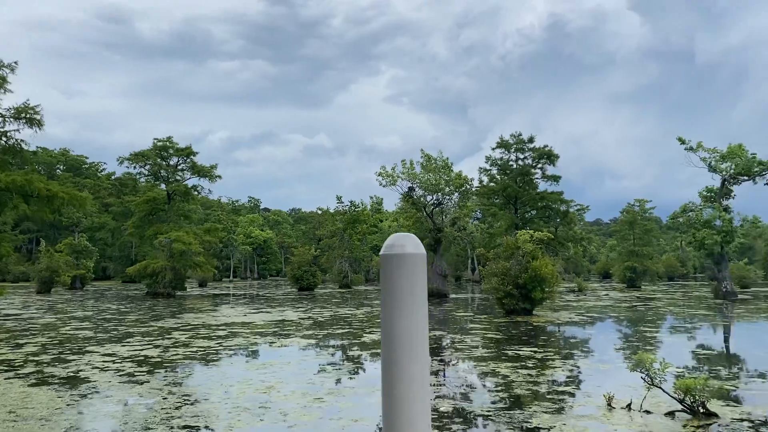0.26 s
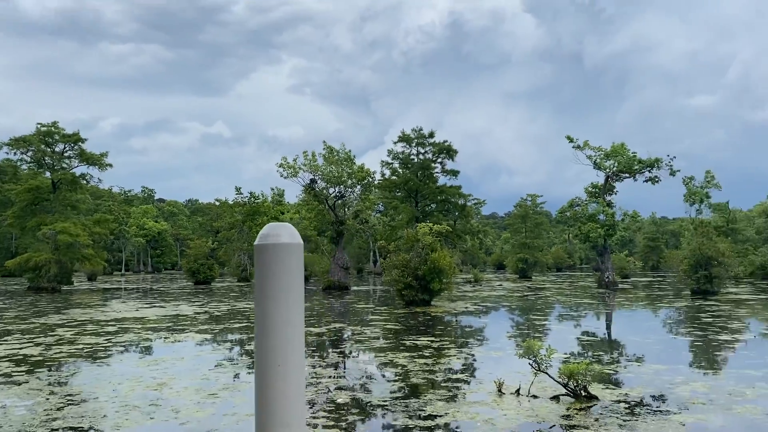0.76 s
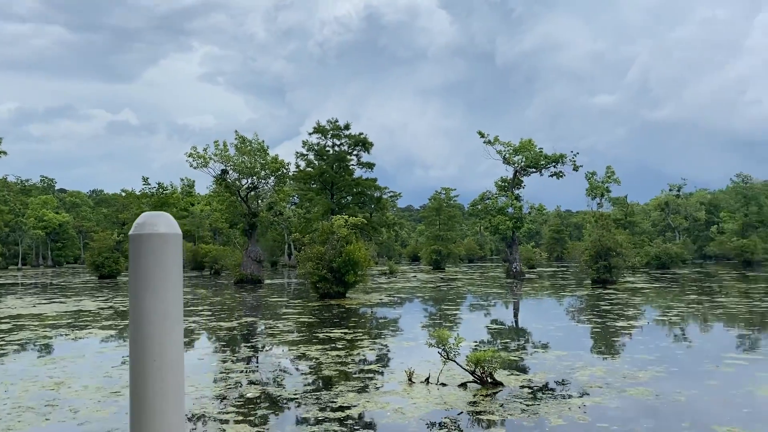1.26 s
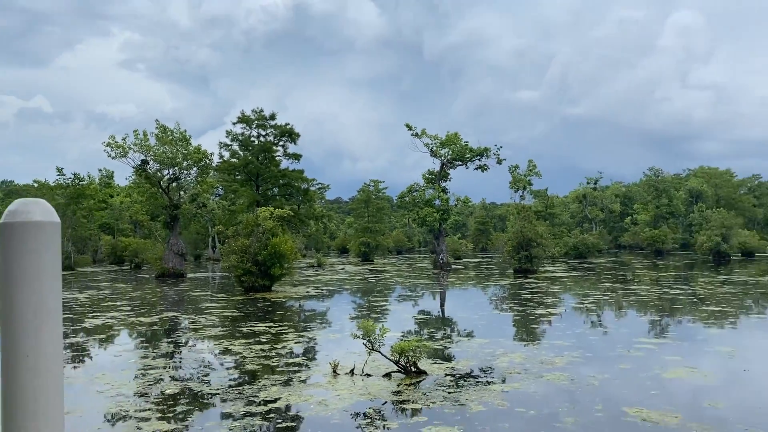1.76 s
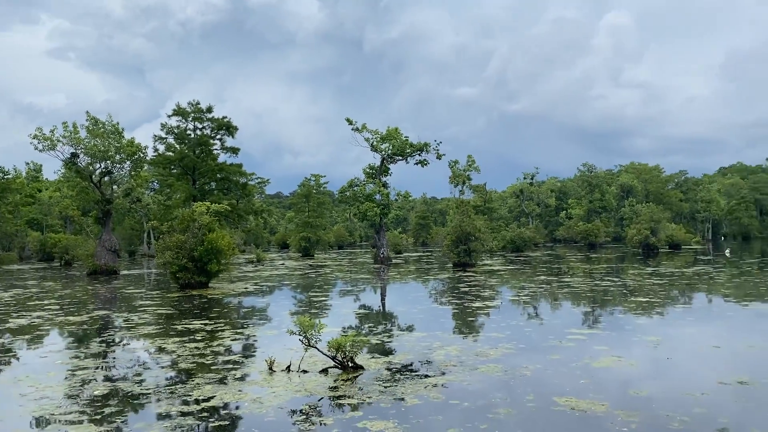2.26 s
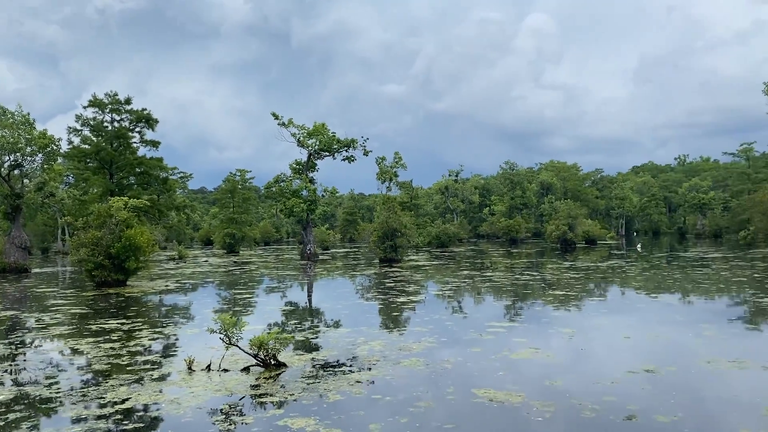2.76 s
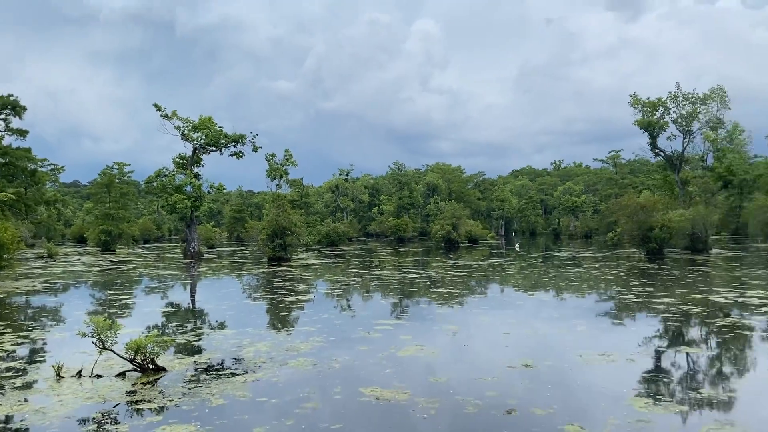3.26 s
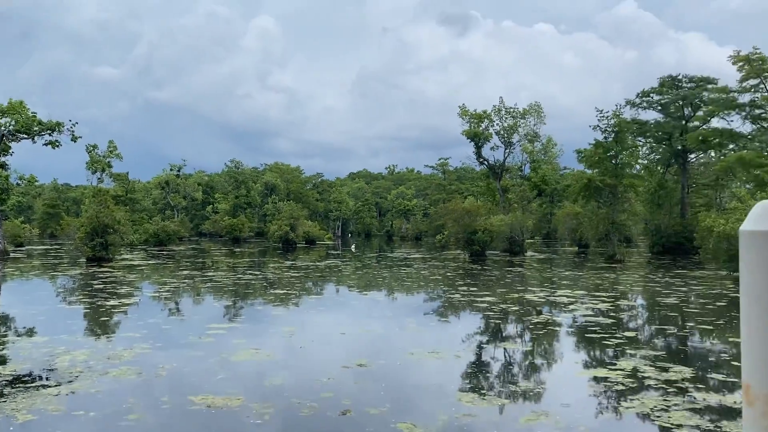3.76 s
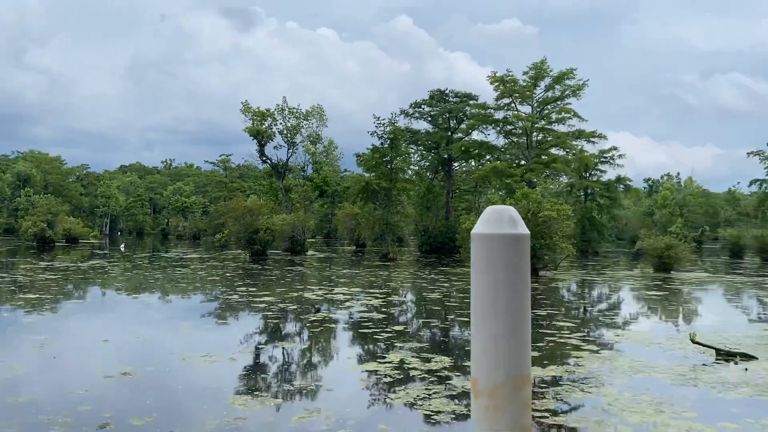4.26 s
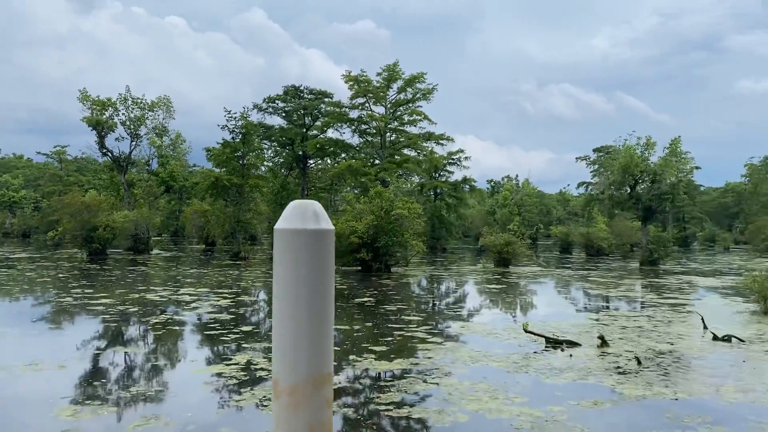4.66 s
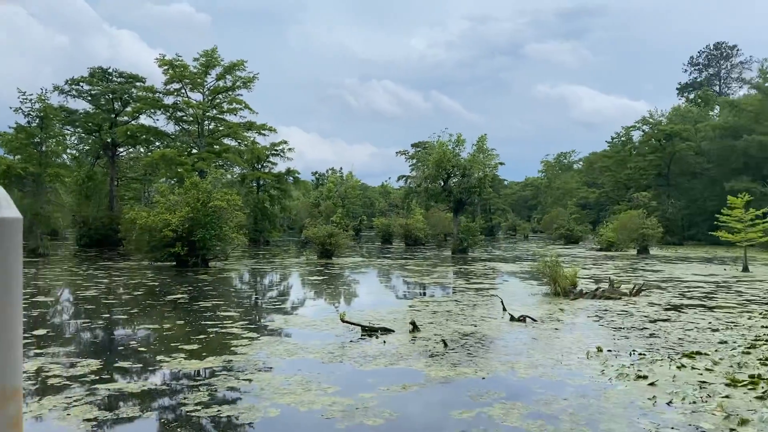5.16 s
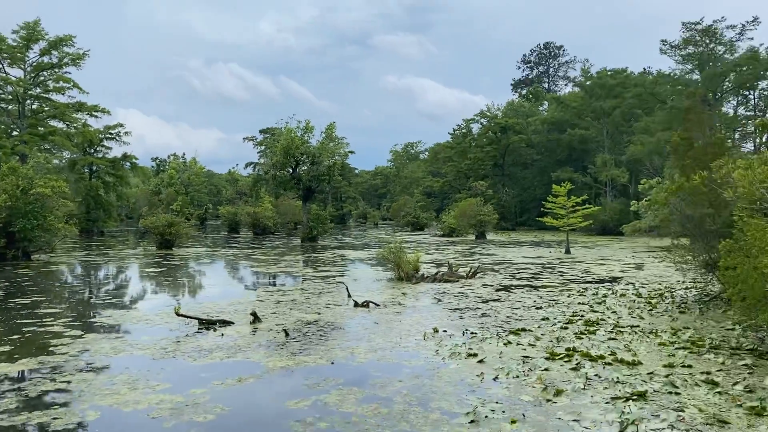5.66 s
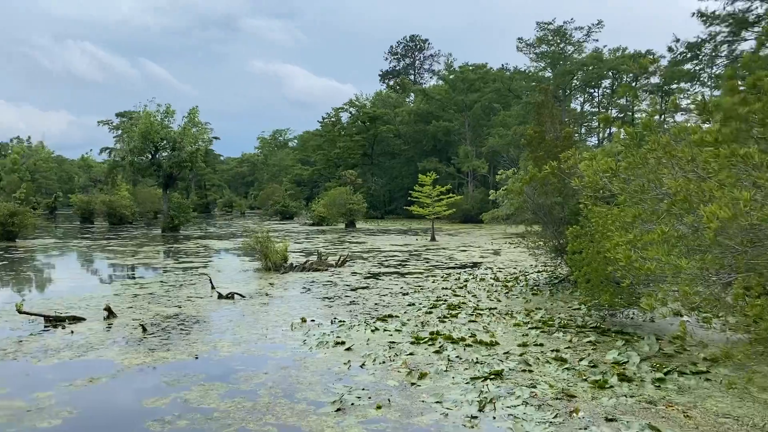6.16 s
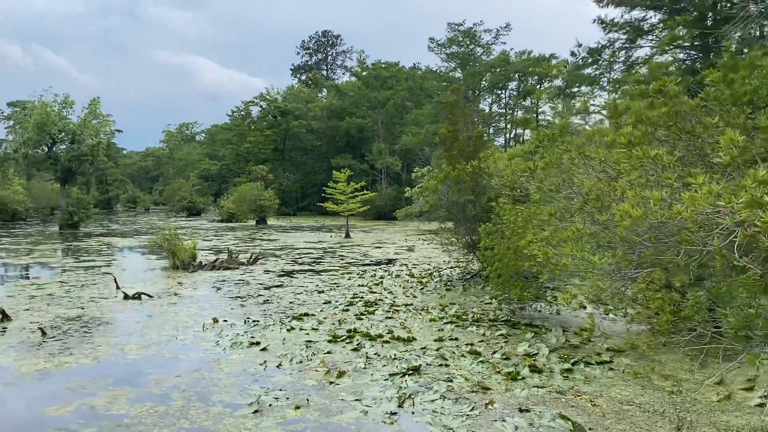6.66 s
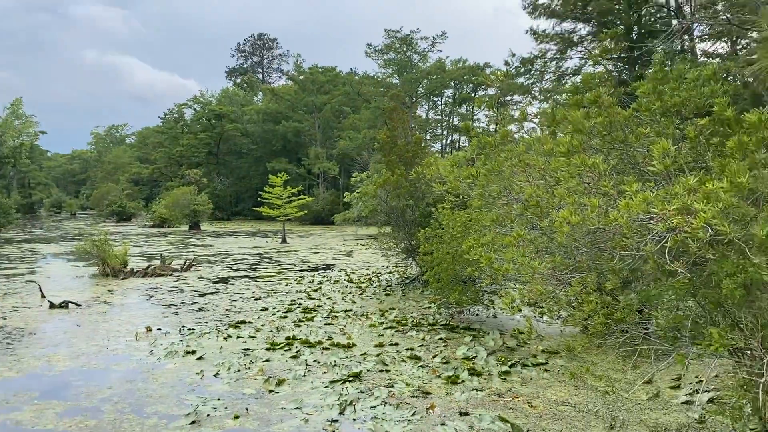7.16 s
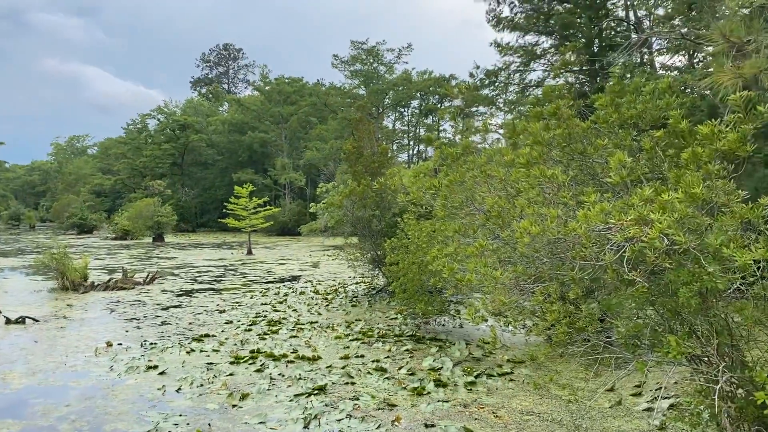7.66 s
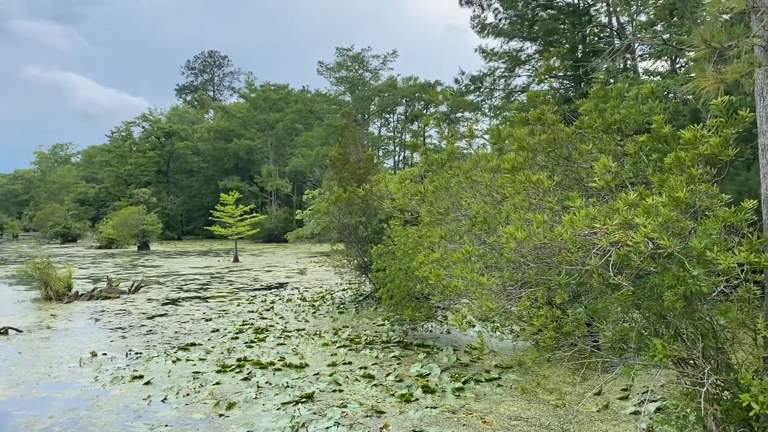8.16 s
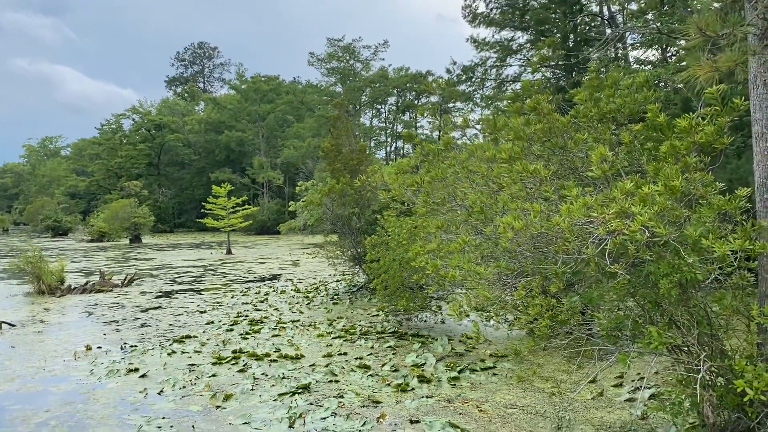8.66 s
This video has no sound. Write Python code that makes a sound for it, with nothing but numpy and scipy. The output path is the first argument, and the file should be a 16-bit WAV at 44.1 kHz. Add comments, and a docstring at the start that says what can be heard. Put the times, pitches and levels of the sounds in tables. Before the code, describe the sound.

High, clicking frog calls carry across a pond, joined by increasingly strong sharp ticks above a soft low rumble.

```python
"""Cricket frogs in a swamp

Frogs click across a pond while the listener slowly turns. Each note is a burst of pulses that ring
the vocal sac: double calls, high peeps, rattles and clucks. Far frogs join in, sharp ticks come from
the near bank, a faint bird whistles and the trees echo. Under it all lie a few dull knocks, two
distant hollow booms, a low rumble and a hush of air."""
import sys
import numpy as np
from scipy import signal
from scipy.fft import rfft, irfft, next_fast_len
from scipy.io import wavfile
from scipy.ndimage import uniform_filter1d, map_coordinates

SR = 44100
rng = np.random.default_rng(int(sys.argv[2]) if len(sys.argv) > 2 else 0)


def store_wav(level_fs):
    """Save 16-bit WAV to argv[1]."""
    pcm = np.round(np.clip(np.atleast_2d(level_fs), -1, 1) * 32767)
    wavfile.write(sys.argv[1], SR, pcm.T.astype(np.int16))


N = 392490

# the leading frog (time [s], level [dB], length [s], head start of its short first note [s])
DOUBLE_CALLS = [(0.468, -48.5, 0.014, 0.027), (2.0364, -37, 0.016, 0.039), (2.3899, -39.5, 0.037, 0.024),
                (2.6103, -37.5, 0.028, 0.051), (2.977, -38.5, 0.04, 0.021), (3.197, -37, 0.025, 0.038),
                (3.4022, -37, 0.033, 0.047), (3.6018, -37.5, 0.024, 0.044), (3.786, -39.5, 0.036, 0.033),
                (4.578, -42, 0.029, 0.062), (4.789, -37, 0.03, 0.038), (4.982, -37, 0.028, 0.036),
                (5.176, -36.5, 0.019, 0.029), (5.3647, -37, 0.024, 0.046), (5.5688, -37, 0.017, 0.032),
                (5.743, -37, 0.028, 0.016)]
# a small, high frog (time [s], level [dB], length [s])
PEEPS = [(0.168, -46, 0.014), (0.7611, -46, 0.027), (1.361, -42.5, 0.021), (1.915, -42.5, 0.028),
         (2.719, -46, 0.017), (3.252, -51, 0.04), (4.906, -40.5, 0.03), (5.111, -43.5, 0.0042),
         (5.4582, -40.5, 0.024), (5.748, -43, 0.045), (6.567, -40.5, 0.025), (6.6066, -41.5, 0.033),
         (7.147, -38, 0.019), (7.284, -41, 0.017), (7.69, -39.5, 0.044), (8.253, -39.5, 0.045),
         (8.325, -42.5, 0.035)]
# long rattles and short clucks (time [s], level [dB], length [s], pitch [Hz])
RATTLES = [(.025, -47.5, 0.08, 3460), (.624, -44.5, 0.081, 3560), (1.213, -41, 0.056, 3620),
           (1.758, -39.5, 0.06, 3614), (2.217, -51.5, 0.04, 4380), (3.985, -48, 0.035, 3305),
           (4.202, -41.5, 0.046, 3504), (4.352, -39.5, 0.05, 3796), (5.848, -42, 0.034, 3720),
           (5.973, -46.5, 0.05, 4000), (6.204, -50, 0.052, 3560), (6.459, -42, 0.046, 3770),
           (7.032, -49.5, .067, 3736), (7.127, -38.5, 0.05, 3776), (7.55, -46.5, 0.035, 3800),
           (7.823, -42, 0.047, 3780), (8.125, -46.5, 0.04, 3740), (8.583, -42, 0.044, 3703),
           (8.792, -47, 0.039, 3830)]
CLUCKS = [(.122, -55, 0.014, 3820), (.26, -49.5, .025, 3655), (.726, -47, 0.011, 3720),
          (.831, -43, 0.019, 3765), (.896, -45.5, 0.023, 3650), (1.137, -48.5, 0.028, 3620),
          (1.301, -44, 0.014, 3660), (1.645, -45, 0.015, 3770), (1.724, -44.5, 0.025, 3700),
          (2.4872, -45.5, 0.019, 3620), (2.516, -45.5, 0.016, 3620), (2.779, -52, 0.037, 3820),
          (3.104, -49, 0.023, 3760), (3.305, -50, 0.037, 3420), (3.525, -51.5, 0.0085, 3690),
          (3.934, -49.5, 0.014, 3440), (4.125, -51.5, 0.032, 3720), (4.485, -55, 0.041, 3750),
          (5.018, -40.5, .018, 3890), (5.272, -47.5, 0.033, 3755), (6.65, -46, 0.036, 3650),
          (6.696, -42.5, 0.017, 3780), (7.318, -47, 0.027, 3750), (7.636, -41, 0.022, 3880),
          (8.035, -56.5, 0.0098, 3950), (8.185, -47.5, 0.042, 3570), (8.377, -43.5, 0.047, 3810),
          (8.415, -41.5, 0.011, 3820)]
# how the vocal sac rings (multiple of the pitch, level [dB], fade time [s])
SAC_RINGS = [(1, 2, 0.0023), (.83, -9, 0.0021), (1.9, -35, 0.0015)]
# how the frog's body shapes a note (multiple of the pitch, level [dB])
BODY_TONE = [(.66, -6), (.79, 1), (1.1, 0), (1.23, -5), (1.4, 0)]
# the frogs as the listener turns (time [s], left ear delay [ms], left over right [dB], treble [dB])
TURN = [(0, 0.52, 8.5, -22), (2.3, 0.32, 15.5, -13), (3.9, 0.34, 5.5, -8), (4.5, -0.013, 3, -1.5),
        (6.4, -.015, 5.5, 8), (8.9, -0.016, 8, -5)]
# ticks on the near bank (time [s], level [dB], pitch [Hz], left over right [dB])
TICKS = [(2.840, -41, 3900, 8), (2.854, -29, 3790, 12), (3.7051, -31.5, 3370, 7), (3.859, -34.5, 3400, 9),
         (4.3302, -29, 3760, 8), (4.3784, -35.5, 3680, 11.5), (4.9266, -21.5, 3600, 9.5),
         (5.5724, -23, 3660, 1), (6.0086, -24, 3590, 3), (6.1569, -24.5, 3460, 8), (6.78, -19.5, 3650, 3),
         (6.8814, -25.5, 3240, 6.5), (7.6, -20.5, 3560, 2), (7.731, -26.5, 3010, 4.5),
         (8.238, -20, 3600, 0.5), (8.5451, -25.5, 3040, 6), (8.8796, -16.5, 3750, 2)]
# the pulses inside one tick (time [s], level [dB])
TICK_PULSES = [(0, 0), (.0022, -3.5), (.0036, -9.5), (.0051, -11), (.0068, -15), (.009, -21)]
# the ticks' top treble, which opens up with the turn (time [s], level [dB])
TICK_TREBLE = [(4.4, -17), (5, 1.5), (8.9, 0)]
# knocks and plops (time [s], level [dB], pitch [Hz], time to fade 60 dB [s], scuff [dB], rise [s])
KNOCKS = [(.256, -47, 605, 0.03, -28, 0.0018), (3.121, -52.5, 151.4, 0.19, -14.5, .005),
          (4.058, -70.5, 337, 0.021, 5, 0.0055), (4.926, -37.5, 112.5, 0.12, -25, 0.0089),
          (5.657, -65.5, 955, .095, 7, .025), (5.768, -59, 1820, .028, -9, .002),
          (5.851, -62, 900, .028, -11, .002), (6.311, -51.5, 1440, 0.03, -5.5, 0.0037),
          (7.251, -22.5, 94, .039, -58, 0.011)]
# booms from across the water (time [s], level [dB], swell [s], fade [s])
BOOMS = [(0.289, -62.5, 0.023, 0.033), (6.419, -57, 0.077, 0.079)]
# a far bird (time [s], length [s], pitch [Hz], level [dB])
WHISTLES = [(0, .04, 2810, -58), (.22, .17, 2780, -68), (.31, .08, 2570, -72)]
# how long the trees echo (frequency [Hz], time to fade 60 dB [s])
ECHO_FADE = [(300, 0.19), (3500, 0.7), (7000, 0.19), (14000, 0.073)]
# how the background layers rise and fall (time [s], level [dB])
CHORUS_LEVEL = [(0, -61.5), (1.1, -63), (2.5, -62.5), (5.7, -55.5), (7.2, -61), (8.9, -61)]
RUMBLE_LEVEL = [(0, -55), (1.5, -59), (2.8, -55), (3.7, -59.5), (4.4, -56), (8.9, -58)]
AIR_LEVEL = [(0, -77.5), (4.1, -76.5), (8.9, -73)]
RUSTLE_LEVEL = [(6.9, -100), (7.6, -71.5), (8.2, -81.5), (8.9, -80)]
# the tone of each noise and of the echo (frequency [Hz], level [dB])
RASP_TONE = [(600, -45.5), (1600, 5.5), (2400, -0.5), (3200, -4), (4300, 2), (5100, 8.5), (6000, -8.5),
             (7100, -6.5), (8500, -28.5), (12000, -31), (14000, -24.5), (15300, -41.5)]
CRACK_TONE = [(700, -65), (1500, -2.5), (2200, -4.5), (3000, 8), (4500, 11), (5500, 4.5), (6100, 2),
              (7500, -8.5), (9000, -17), (12000, -24), (14000, -17), (15500, -32.5)]
CHORUS_TONE = [(1000, -57.5), (2200, -37), (2850, -11), (3300, -5.5), (3680, 1), (4200, -10.5),
               (4700, -19.5), (6800, -28.5), (8500, -48.5), (15000, -74)]
SCUFF_TONE = [(100, -3), (400, -8.5), (1000, -8.5), (1600, -12.5), (2300, -26), (3200, -41.5), (8000, -78)]
BOOM_TONE = [(200, -9), (380, -23), (470, -10), (570, -2.5), (700, -19.5), (1100, -30.5), (2000, -34),
             (5000, -45), (12000, -58.5)]
ECHO_TONE = [(2400, 1), (2900, 3.5), (3650, -2), (4200, 0), (5000, 4)]
RUMBLE_TONE = [(12, -75), (20, -34.5), (29, -25), (41, -2.5), (76, 4), (101, -2), (156, -10), (189, -15.5),
               (323, -32), (400, -46), (520, -49.5), (880, -120)]
AIR_TONE = [(150, 10), (300, 1), (400, -0.5), (560, 2), (800, -4.5), (1200, -11.5), (2200, -7.5),
            (5000, -21), (8000, -40), (9700, -22.5), (11000, -32.5), (12500, -45.5), (15500, -44.5)]
RUSTLE_TONE = [(200, -4.5), (700, .5), (1100, 4), (1500, -10.5), (4000, -44)]

LEADER_HZ, PEEP_HZ, TOP_HZ = 3673, 4080, 15600


def frog_note(length, hz, treble_db, attack, swell_share, rasp_db, scatter_db):
    """Slowing pulses ring the vocal sac; short notes start strong, long ones stutter in and swell."""
    t = np.arange(int((length + .012) * SR)) / SR
    pulse = np.arange(40)
    chance = rng.standard_normal((len(pulse), 3))  # nudges each pulse's gap, level and pitch
    stutter = np.clip((length - .035) / .02, 0, 1)
    gaps = .0031 * (1 + .1 * pulse) + stutter * .0064 * np.exp(-pulse / 1.1)
    gaps *= (3600 / hz) ** 1.3 * (1 + .0503 * chance[:, 0])  # smaller, higher frogs pulse faster
    starts = np.cumsum(gaps) - gaps
    heard = starts < max(length - .001, .002)
    starts, chance = starts[heard], chance[heard]
    crest = max(length - .027, 1e-4) * swell_share
    first_db = -6 * min(crest / .0082, 1)
    pulse_db = np.interp(starts, [0, crest, max(length, crest) + 1e-4], [first_db, 0, -8])
    age = np.maximum(t - starts[:, None], 0)
    push = amp(pulse_db + scatter_db * chance[:, 1])[:, None] * (1 - np.exp(-(age / attack) ** 2))
    phase = 2 * np.pi * hz * (1 + (.01 + .018 * stutter) * chance[:, 2:3]) * age
    ring = sum(amp(db) * push * np.exp(-age / fade) * np.sin(m * phase) for m, db, fade in SAC_RINGS)
    puffs = (push * np.exp(-age / .0018)).sum(0)
    rasp = amp(rasp_db - 1 + 2 * stutter) * puffs * noise(RASP_TONE, len(t))
    body = [(m * hz, db) for m, db in BODY_TONE] + [(8000, 1), (13000, treble_db)]
    return even_peak(shaped(ring.sum(0) + rasp, body), window=190)


def main_calls():
    """The notes that stir the far frogs (time [s], level [dB], length [s], pitch [Hz])."""
    leader = [(s, db, length, LEADER_HZ) for s, db, length, _ in DOUBLE_CALLS]
    peeps = [(s, db, length, PEEP_HZ) for s, db, length in PEEPS]
    return leader + peeps + RATTLES


def near_frogs():
    """The notes shift as the listener turns; reeds and water scatter a little of each one."""
    out = np.zeros((2, N))
    t = np.arange(SR // 20) / SR
    times, *turn = np.transpose(TURN)
    first_notes = [(s - ahead, db - 5, .011, LEADER_HZ) for s, db, _, ahead in DOUBLE_CALLS]
    for s, db, length, hz in main_calls() + first_notes + CLUCKS:
        lag_ms, pan_db, treble_db = (np.interp(s, times, column) for column in turn)
        pan_db += rng.normal(0, 2) - (hz - 3650) / 100  # higher voices sit further right
        hz *= rng.normal(1, .01)
        call = frog_note(length, hz, treble_db, attack=.0005, swell_share=.6,
                         rasp_db=-19, scatter_db=1.5)
        lag_ms += rng.normal(0, .018)
        add(out, s + .0005, amp(db - 2) * placed(call, pan_db, lag_ms))
        reeds = unit(rng.standard_normal((2, len(t))) * amp(-60 * t / .06)) / np.sqrt(len(t))
        scatter = signal.fftconvolve(call[None], reeds, axes=1)
        add(out, s + .002, amp(db - 10.5) * placed(scatter, pan_db / 2, lag_ms=0))
    return out


def ticks():
    """Each tick is a hard pulse, a few weaker ones that ring lower and lower, and a rough tail."""
    out = np.zeros((2, N))
    t = np.arange(SR // 30) / SR
    tail_fade = np.exp(-t / .012)
    for s, db, hz, pan_db in TICKS:
        ring, force = np.zeros((2, len(t)))
        for start, pulse_db in TICK_PULSES:
            age = np.maximum(t - start * rng.uniform(.92, 1.08), 0)
            glide = .27 * (np.exp(-start / .0035) - .7)
            pitch = hz * (1 + glide + rng.normal(0, .02))
            shape = (1 - np.exp(-(age / .0007) ** 2)) * np.exp(-age / (.0008 + .04 * start))
            push = amp(pulse_db + rng.normal(0, 1)) * shape
            ring += push * np.sin(2 * np.pi * pitch * age)
            force += push
        tail = amp(-5.5) * force.max() * (1 - tail_fade) * tail_fade
        crack_db = -14.5 + (3700 - hz) / 100  # lower ticks crack harder
        crack = amp(crack_db) * (force + tail) * noise(CRACK_TONE, len(t))
        treble = [(9000, 0), (11500, np.interp(s, *np.transpose(TICK_TREBLE)))]
        tick = even_peak(shaped(ring + crack, treble), window=130)
        add(out, s + .00064, amp(db - 12) * placed(tick, pan_db, lag_ms=rng.normal(-.02, .012)))
    return out


def excitement(rise_s=.011, fade_s=.16):
    """How excited the far frogs are, 0 to 1: each main call stirs them, then they calm down."""
    t = np.arange(SR) / SR
    stir = (1 - np.exp(-t / rise_s)) * np.exp(-t / fade_s)
    total = np.zeros((1, N))
    for s, *_ in main_calls():
        add(total, s, stir[None])
    return np.tanh(2 * total[0])


def far_frogs():
    """Faint notes, more and louder when excited; the farthest frogs blur into a fluttering hiss."""
    notes = np.zeros((2, N))
    excited = excitement()
    urge = np.cumsum(.05 + excited)  # grows slowly even in a lull
    for when, softness, pitch, span, side in rng.random((130, 5)):
        call = frog_note(length=.01 + .035 * span, hz=3250 + 750 * pitch, treble_db=-6,
                         attack=.0007, swell_share=.45, rasp_db=-21, scatter_db=2)
        s = np.searchsorted(urge, when * urge[-1]) / SR
        add(notes, s, amp(-7 * softness) * placed(call, pan_db=2, lag_ms=side - .5))
    flutter = amp(3.5 * np.array([wobble(45), wobble(45)]) + 1.5 * wobble(300) + .56 * wobble(4.9))
    blur = wide(unit(flutter * noise(CHORUS_TONE, (2, N))), side_db=-2) * amp([[1], [-1]])
    return amp(curve(CHORUS_LEVEL) - 10 + 6 * excited) * (blur + unit(notes))


def knocks():
    """Each dull knock rings briefly, with a scuff of noise."""
    out = np.zeros((2, N))
    t = np.arange(SR // 3) / SR
    for s, db, hz, fade, scuff_db, rise in KNOCKS:
        ring = np.sin(2 * np.pi * hz * t) * amp(-60 * t / fade)
        scuff = amp(scuff_db + 2.5) * noise(SCUFF_TONE, (2, len(t))) * amp(-60 * t / .092)
        add(out, s, amp(db + 9) * (1 - np.exp(-t / rise)) * (ring + scuff))
    return out


def booms():
    """Hollow booms swell and roll away across the water."""
    out = np.zeros((2, N))
    t = np.arange(SR // 2) / SR - .1  # zero at the loudest moment
    for s, db, swell, fade in BOOMS:
        shape = np.exp(-np.maximum(-t / swell, t / fade))
        add(out, s - .1, amp(db + 2) * shape * wide(noise(BOOM_TONE, (2, len(t))), side_db=-5))
    return out


def bird():
    """Thin, wavering whistles that sink a little."""
    out = np.zeros((2, N))
    for s, length, hz, db in WHISTLES:
        progress = np.linspace(0, 1, int(length * SR))
        pitch = hz * (1 - .02 * (progress - .5) + .015 * wobble(200)[:len(progress)])
        swell = np.sqrt(progress * (1 - progress)) * amp(4 * wobble(60)[:len(progress)])
        whistle = swell * np.sin(2 * np.pi * np.cumsum(pitch) / SR)
        add(out, s, amp(db) * placed(whistle, pan_db=.84, lag_ms=0))
    return out


def tree_echo(x):
    """The trees send back a blurred echo, a new one for each overlapping stretch of sound."""
    out = np.zeros((2, N))
    x = shaped(x, ECHO_TONE)
    step = SR // 3
    for i in range(0, N + step, step):
        span = np.arange(max(i - step, 0), min(i + step, N))
        stretch = x[span] * np.cos(np.pi / 2 * (span - i) / step)
        hz, t, bands = signal.stft(rng.standard_normal((2, SR // 2)), SR, nperseg=256)
        fade = amp(-60 * t / along(ECHO_FADE, hz)[:, None])
        tail = signal.istft(bands * fade, SR, nperseg=256)[1]
        tail /= np.linalg.norm(tail[0])
        add(out, span[0] / SR + .011, signal.fftconvolve(stretch[None], tail, axes=1))
    return out


def background():
    """A low rumble, alike in both ears, a wide hush of air and a faint, late rustle of breeze."""
    rumble_db = curve(RUMBLE_LEVEL) + 3 + .64 * wobble(6)
    rumble = amp(rumble_db) * wide(noise(RUMBLE_TONE, (2, N)), side_db=-18.5)
    hush = amp(curve(AIR_LEVEL) + 4 + 1.4 * wobble(11)) * wide(noise(AIR_TONE, (2, N)), side_db=-2)
    rustle = amp(curve(RUSTLE_LEVEL) - 2) * wide(noise(RUSTLE_TONE, (2, N)), side_db=-2)
    return rumble + hush + rustle


def amp(db):
    """Turn decibels into a gain."""
    return 10 ** (np.asarray(db) / 20)


def unit(x):
    """Scale x to an average strength (rms) of 1."""
    return x / np.sqrt(np.mean(x ** 2) + 1e-20)


def even_peak(x, window):
    """Scale x so that its loudest window of samples has strength 1."""
    return x / np.sqrt(uniform_filter1d(x ** 2, size=window).max())


def along(points, hz):
    """Read a table of (frequency [Hz], value) on a log scale."""
    freqs, values = np.transpose(points)
    return np.interp(np.log(hz + 1), np.log(freqs + 1), values)


def curve(rows):
    """Turn (time [s], value) rows into one value per sample."""
    return np.interp(np.arange(N) / SR, *np.transpose(rows))


def wobble(rate):
    """A smooth curve through `rate` random points a second."""
    return map_coordinates(rng.standard_normal(int(N * rate / SR) + 4), [np.arange(N) * rate / SR])


def filtered(x, response):
    """Multiply each frequency in x by response(hz)."""
    n = x.shape[-1]
    padded = next_fast_len(n + 2048)
    return irfft(rfft(x, padded) * response(np.fft.rfftfreq(padded, 1 / SR)), padded)[..., :n]


def shaped(x, tone):
    """Give x a tone (frequency [Hz], level [dB])."""
    return filtered(x, lambda hz: amp(along(tone, hz)))


def noise(tone, size):
    """Noise of strength 1 with the given tone."""
    return unit(shaped(rng.standard_normal(size), tone))


def wide(pair, side_db):
    """Use two unrelated signals as the middle and the side of a stereo sound."""
    side = amp(side_db) * pair[1]
    return np.array([pair[0] + side, pair[0] - side])


def placed(x, pan_db, lag_ms):
    """Make x louder by pan_db and later by lag_ms in the left ear than in the right."""
    gains = amp([[pan_db / 2], [-pan_db / 2]])
    lag = np.array([[lag_ms], [-lag_ms]]) / 2000
    return unit(gains) * filtered(x, lambda hz: np.exp(-2j * np.pi * hz * lag))


def add(track, s, x):
    """Mix x into the track at s seconds."""
    i = int(np.clip(round(s * SR), 0, N - 1))
    track[:, i:i + x.shape[-1]] += x[:, :N - i]


def scene():
    """Frogs, ticks and a bird with their echo, over the far chorus and the background."""
    pond, whistles, bank = near_frogs(), bird(), ticks()
    direct = pond + bank + amp(-7) * whistles
    echo = tree_echo(amp(-13.5) * pond[0] + amp(-21) * bank[0] + amp(-6) * whistles[0])
    return direct + echo + far_frogs() + knocks() + booms() + background()


def record(dry):
    """Cut away the very highest treble."""
    return filtered(dry, lambda hz: hz < TOP_HZ)


dry = scene()
out = record(dry)
store_wav(out)
```